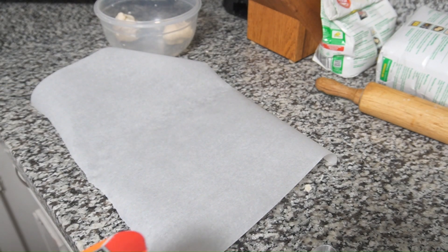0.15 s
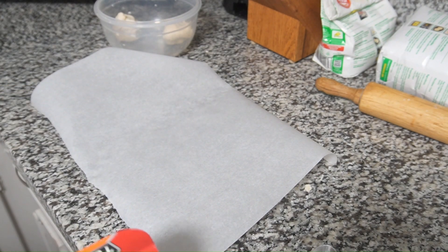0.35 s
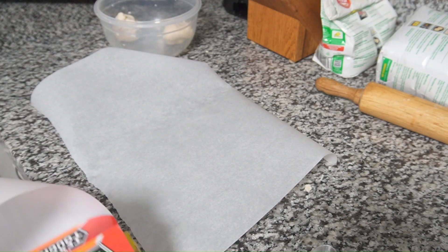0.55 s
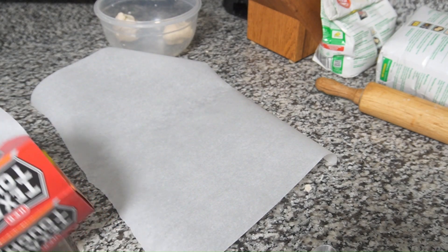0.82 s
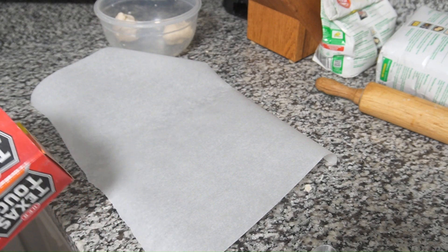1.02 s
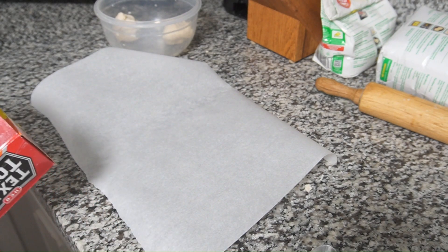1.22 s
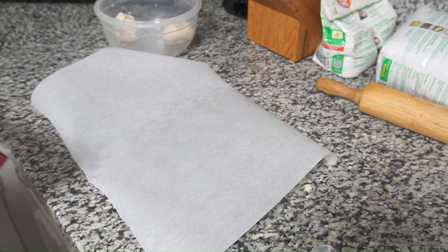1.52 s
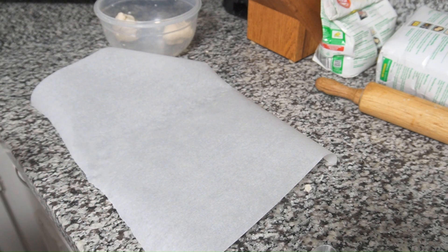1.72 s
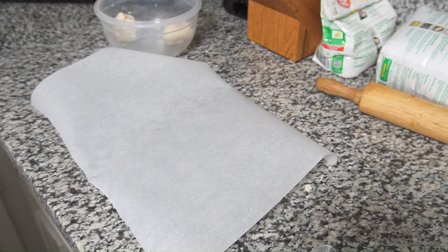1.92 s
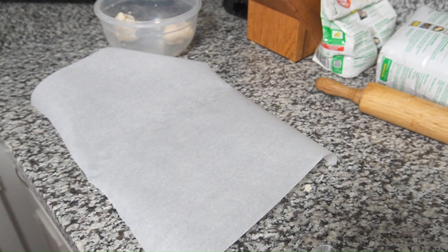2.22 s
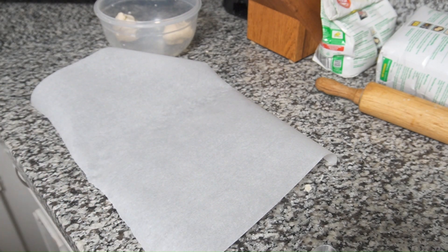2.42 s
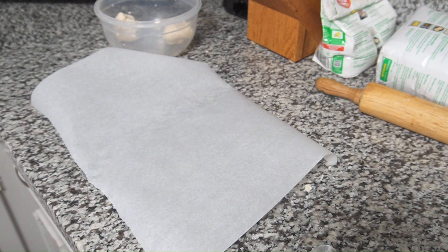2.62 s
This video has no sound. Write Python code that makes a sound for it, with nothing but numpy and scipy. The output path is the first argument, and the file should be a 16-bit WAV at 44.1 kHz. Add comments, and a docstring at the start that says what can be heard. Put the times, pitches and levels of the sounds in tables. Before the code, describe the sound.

Parchment paper rustles and slides over a stone counter in uneven strokes, with small crisp crackles.

```python
"""A sheet of parchment paper is smoothed and slid over a stone countertop in a small kitchen.
Each stroke is a stream of tiny random slips over a fine hiss, coloured by the paper and a ringing sheet.
Creases snap as short bursts of pitched noise; a soft pat near the end is a few fading sine waves.
The counter and walls scatter these sounds as decaying noise echoes. Under it all lie soft air noise
and a low appliance hum."""
import sys
import numpy as np
from scipy import signal
from scipy.fft import rfft, irfft
from scipy.io import wavfile
from scipy.ndimage import map_coordinates

SR = 44100
rng = np.random.default_rng(int(sys.argv[2]) if len(sys.argv) > 2 else 0)


def dump_mix(stems):
    """Bounce the given channels to the path in sys.argv[1] as a 16-bit WAV at rate SR."""
    frames = np.atleast_2d(stems).T  # one column per channel
    limited = np.clip(frames, -1, 1)  # hard clip at full scale
    pcm = np.round(limited * 32767).astype(np.int16)
    wavfile.write(sys.argv[1], SR, pcm)


N = 121275  # length in samples, 2.75 s


def undb(db):
    """Turn dB into a plain factor."""
    return 10 ** (np.asarray(db) / 20)


def unit(x):
    """Scale to rms 1."""
    return x / np.sqrt(np.mean(x ** 2))


def curve(points, hz):
    """Read a (Hz, dB) table on a log-frequency axis."""
    f, db = np.array(points).T
    return np.interp(np.log(hz), np.log(f), db)


def bump(hz, centre, octaves):
    """A bell of height 1 on a log-frequency axis."""
    return np.exp(-.5 * (np.log2(hz / centre) / octaves) ** 2)


def high_shelf(hz, corner_hz):
    """Rise from 0 in the lows to 1 in the highs, half way at the corner."""
    return 1 / (1 + (corner_hz / hz) ** 4)


def freqs(n):
    """Bin frequencies in Hz, kept at 1 or more so that their log exists."""
    return np.maximum(np.arange(n // 2 + 1) * SR / n, 1)


def colour(x, db):
    """Filter with the given gain per frequency bin, without sounding ahead of the input."""
    n = len(x)
    # folding the cepstrum forward in time gives the minimum-phase filter
    cepstrum = irfft(np.log(undb(db)), n)
    cepstrum[1:n // 2] *= 2
    cepstrum[n // 2 + 1:] = 0
    return irfft(rfft(x) * np.exp(rfft(cepstrum)), n)


def shape(points, hz):
    """A spectrum in dB that keeps the power of white noise."""
    db = curve(points, hz)
    return db - 10 * np.log10(np.mean(undb(db) ** 2))


def add(out, x, start):
    """Mix x into out from the start time in seconds."""
    i = max(int(start * SR), 0)
    out[i:i + len(x)] += x[:len(out) - i]


SLIPS_PER_S = 5400
SLIP_SPREAD_DB = 2.5  # how uneven the slips are in size
FINE_HISS_DB = -0.5   # hiss compared with the slips


def slips(n):
    """Paper catches on stone in tiny clicks, uneven in size and of either sign, over a fine hiss."""
    happens = rng.random(n) < SLIPS_PER_S / SR
    sign = rng.choice([-1, 1], n)
    size = undb(SLIP_SPREAD_DB * np.minimum(rng.exponential(size=n), 4))
    hiss = undb(FINE_HISS_DB) * rng.standard_normal(n)
    return unit(unit(happens * sign * size) + hiss)


# The basic colour of rubbed paper, also used by the snaps.
# Each row: frequency in Hz, relative strength in dB per Hz.
PAPER_COLOUR = [(50, -40), (150, -25.5), (230, -16.5), (310, -10), (420, -11), (600, -11), (780, -12),
                (1050, -4.5), (1500, -1), (2700, -0.5), (4800, -1.5), (6200, -4.5), (7300, -6.5),
                (10000, -10), (15500, -17)]
TREBLE_HZ, BODY_HZ = 6940, 740
MIDS_HZ, MIDS_OCTAVES, RESONANCE_OCTAVES = 1366, 0.52, 0.15
# The treble grows faster with speed, by this extra power.
BRIGHTEN, BRIGHTEN_HZ = 0.31, 6600
# The strokes of the hand.
# Each row: start in seconds, rise in seconds, hold in seconds, fall time constant in seconds,
# level in dB (before its colour and the room), treble in dB, mids in dB, body in dB,
# resonance of the sheet in Hz, height of that resonance in dB.
STROKES = [ (0.0, 0.0013, 0.0056, 0.029, -35.5, -1, 2.5, 5, 3270, 6),
           (0.061, 0.027, 0.012, 0.02, -36.5, 1, 2.5, -13, 1500, 5.5),
           (0.201, 0.0036, 0.01, 0.017, -34, -4, 6, -2, 1420, 2),
           (0.223, .003, .01, 0.011, -33.5, 5, 3.5, 4, 3600, 6),
           (0.245, 0.012, 0.046, 0.023, -33.5, -3, 4.5, 5.5, 2440, 6.5),
           (0.309, 0.018, 0.1, 0.066, -27, 6.5, 4.5, 9.5, 1570, -3),
           (0.377, 0.033, .008, 0.01, -30, 9, 6.5, 14, 975, 15.5),
           (0.403, 0.065, 0.18, 0.032, -24, 4.5, 0, 3.5, 5200, 1),
           (0.677, 0.028, 0.044, .02, -32, -4, 4, -1, 1890, 3.5),
           (0.721, 0.029, 0.024, 0.04, -24.5, 4, -4, 1, 4800, 3),
           (0.827, 0.028, 0.073, .02, -23.5, -8.5, -1, -1, 5170, 2.5),
           (0.899, 0.0023, 0.0054, .01, -22, -0.5, -20, -2, 4260, 5),
           (0.935, 0.034, 0.072, 0.024, -23.5, -8.5, 1, -3.5, 5500, 2.5),
           (0.991, 0.022, 0.022, .015, -33, 9, -2, 0, 2450, -10),
           (1.119, 0.043, 0.028, 0.03, -25, -4.5, 4.5, -2, 1660, -0.5),
           (1.273, .04, .02, .02, -35.5, -3.5, 6.5, 1, 1200, 6),
           (1.317, 0.038, 0.019, 0.03, -24.5, -0.5, -1, -3, 1306, 9.5),
           (1.391, 0.038, 0.022, 0.035, -29, -5.5, 7, 0.5, 535, 8.5),
           (1.475, 0.0012, 0.0054, 0.019, -32.5, 13.5, -6, -6, 3740, 6),
           (1.563, 0.0048, 0.063, 0.066, -35, -4.5, 2.5, 6.5, 1940, 1),
           (1.636, 0.075, .03, 0.025, -21.5, -2, 1, 2, 368, 4.5),
           (1.733, 0.028, 0.056, 0.025, -24, 6, 1, 1, 2960, 6),
           (1.802, 0.047, 0.17, 0.041, -23.5, 5, 0, 2, 500, 0),
           (2.016, 0.046, 0.037, 0.035, -21.5, -1, -3, 2.5, 312, 6),
           (2.108, 0.018, 0.036, 0.05, -27, -5.5, 0, -7, 2300, 1),
           (2.238, 0.0028, 0.02, 0.052, -29.5, -3, -5.5, 6.5, 500, 3),
           (2.28, 0.0054, 0.021, 0.059, -23, 1.5, -2.5, 0.5, 4430, 1),
           (2.379, 0.025, 0.01, 0.056, -27, -1.5, -6, 1.5, 2800, 2),
           (2.478, 0.013, 0.081, 0.021, -44.5, 2.5, 3, 4, 3520, 0),
           (2.579, 0.0054, 0.021, 0.014, -47.5, -9, 0.5, 21, 2350, 7),
           (2.695, 0.029, 0.022, .02, -49, 0, 3, -5.5, 4000, -1), ]


def strokes(size=32768):
    """Each stroke swells, holds and dies away, brighter when fast; the free sheet sets its colour."""
    out, t, hz = np.zeros(N), np.arange(size) / SR, freqs(size)
    for start, rise, hold, fall, db, treble, mids, body, ring_hz, ring_db in STROKES:
        swell = np.minimum(t / rise, 1)
        speed = swell * np.exp(-np.maximum(t - rise - hold, 0) / fall)
        rub = slips(size) * speed
        high = irfft(rfft(rub) * high_shelf(hz, BRIGHTEN_HZ))
        brightened = rub + high * (speed ** BRIGHTEN - 1)
        tone = shape(PAPER_COLOUR, hz)
        tone += treble * high_shelf(hz, TREBLE_HZ)
        tone += mids * bump(hz, MIDS_HZ, MIDS_OCTAVES)
        tone += body / (1 + (hz / BODY_HZ) ** 4)  # a shelf for the lows
        tone += ring_db * bump(hz, ring_hz, RESONANCE_OCTAVES)
        add(out, undb(db) * colour(brightened, tone), start)
    return out


FLEX_DB = 0.57  # strength of the random gain changes
FLEX_PER_S, FLEX_PER_OCTAVE = 34, 6  # random points per second and, in the treble, per octave


def flex(x):
    """Narrow resonances of the sheet come and go as it bends under the hand."""
    hz, t, z = signal.stft(x, SR, nperseg=512)
    row = np.log2(1 + hz / 100) * FLEX_PER_OCTAVE
    place = np.meshgrid(row, t * FLEX_PER_S, indexing="ij")
    # a smooth random landscape over pitch and time
    wander = map_coordinates(rng.standard_normal(size=(128, 256)), place, order=3, mode="mirror")
    return signal.istft(z * undb(FLEX_DB * wander), SR)[1][:N]


# Counter echo: time constant in seconds, level in dB against the direct sound, before colouring.
SCATTER_S, SCATTER_DB = 0.0028, -7.5
# Room tail: time to fall by 60 dB in seconds, level in dB as above.
ROOM_T60_S, ROOM_DB = 0.54, -7
PATH_CHANGE_S = .04  # a new random echo pattern fades in this often
# Colour of the scattered sound. Each row: frequency in Hz, gain in dB.
SCATTER_COLOUR = [(150, -11.5), (500, -7.5), (1200, 1), (4000, 0), (14000, 3)]
# The walls swallow the treble. Each row: frequency in Hz, gain in dB.
ROOM_COLOUR = [(300, 3), (3000, 1.5), (7000, -0.5), (14000, -5)]
# Left-right difference of the scattered sound. Each row: frequency in Hz, gain in dB.
WIDTH = [(100, -20), (300, -17), (550, -10.5), (1100, -9.5), (2000, -4.5), (4000, -1.5), (8000, 1),
         (14000, 4)]
# The sheet lies a little to the left. Each row: frequency in Hz, left minus right in dB.
PAN = [(200, .3), (600, 1.3), (4000, 1.1), (8000, .1)]


def echoes(x, decay):
    """Many random reflections under a fading outline; the paths change as the hand moves."""
    out, hop = np.zeros(N + 16384), int(PATH_CHANGE_S * SR)
    for centre in range(0, N + hop, hop):
        i = np.arange(max(centre - hop, 0), min(centre + hop, N))
        piece = x[i] * np.cos(np.pi / 2 * (i - centre) / hop)  # crossfade between patterns
        pattern = decay * rng.standard_normal(len(decay))
        add(out, signal.fftconvolve(piece, pattern), i[0] / SR)
    return out


def kitchen(x, size=16384):
    """Direct sound, quick scatter from the counter and a short, duller room tail, in stereo."""
    t, hz = np.arange(size) / SR, freqs(N + size)
    near = unit(np.exp(-t / SCATTER_S) * (1 - np.exp(-t / SCATTER_S)))
    near *= undb(SCATTER_DB) / np.sqrt(size)
    far = unit(np.exp(-np.log(1000) * t / ROOM_T60_S) * np.minimum(t / 0.012, 1))
    far *= undb(ROOM_DB) / np.sqrt(size)

    def scattered():
        tail = colour(echoes(x, far), curve(ROOM_COLOUR, hz))
        return echoes(x, near[:size // 8]) + tail

    mid = x + colour(scattered(), curve(SCATTER_COLOUR, hz))[:N]
    side = colour(scattered(), curve(SCATTER_COLOUR, hz) + curve(WIDTH, hz))[:N]
    pan = curve(PAN, freqs(N)) / 2
    ears = np.array([colour(mid + s * side, s * pan) for s in (1, -1)])  # left, right
    return ears / np.sqrt(1 + np.sum(near ** 2 + far ** 2))


AIR_DB = -49  # air noise that both sides share
AIR_SIDE_DB = -19.5  # left-right difference, compared with the shared part
# Colour of the air noise. Each row: frequency in Hz, relative strength in dB per Hz.
AIR_COLOUR = [(25, -24.5), (60, -7), (130, -2.5), (300, -0.5), (700, -6.5), (1300, -5.5), (3000, -5.5),
              (6000, -12), (15000, -29)]
# Appliance hum. Each row: frequency in Hz, level in dB, phase lead of the left side in cycles.
HUM = [(59.7, -63, .02), (120, -68, 0.076)]


def room_tone():
    """Steady air noise and the hum of an appliance, which reaches the two sides out of step."""
    t, ears = np.arange(N) / SR, np.array([[1], [-1]])
    mid, side = (colour(rng.standard_normal(N), shape(AIR_COLOUR, freqs(N))) for _ in range(2))
    air = undb(AIR_DB) * (mid + undb(AIR_SIDE_DB) * side * ears)
    hum = 0
    for hz, db, lead in HUM:
        cycles = hz * t + rng.random() + ears * lead / 2
        hum = hum + np.sqrt(2) * undb(db) * np.sin(2 * np.pi * cycles)
    return hum + air


SNAP_DECAY_S = 0.0023  # time constant
SNAP_OCTAVES, SNAP_FOCUS_DB = 0.58, 16  # width and height of the pitched peak
SNAP_DB = 0.5  # added to every snap
# Creases that snap.
# Each row: time in seconds, peak level in dB (before the shared boost and the room), pitch in Hz.
SNAPS = [(0.006, -25, 3350), (0.073, -28, 3200), (0.185, -26.5, 2670), (0.2227, -16.5, 3100),
         (0.23, -25, 3970), (0.233, -38, 5050), (0.317, -16, 2940), (0.326, -18, 6300),
         (0.419, -10.5, 1480), (0.422, -12, 1200), (0.448, -12.5, 4500), (0.765, -13, 7000),
         (0.785, -14.5, 9070), (0.9, -14, 4400), (1.108, -22, 9000), (1.479, -23, 7000), (2.553, -31, 5000)]


def snaps(size=2048):
    """A crease flips over with a short, pitched crack: a fading burst of filtered noise."""
    out, t, hz = np.zeros(N), np.arange(size) / SR, freqs(size)
    for start, db, pitch_hz in SNAPS:
        burst = rng.standard_normal(size) * np.exp(-t / SNAP_DECAY_S)
        tone = curve(PAPER_COLOUR, hz) + SNAP_FOCUS_DB * bump(hz, pitch_hz, SNAP_OCTAVES)
        crack = colour(burst, tone)
        add(out, undb(db + SNAP_DB) * crack / np.abs(crack).max(), start)
    return out


# Start in seconds, level in dB before the room, time constant of the soft onset in seconds.
PAT_S, PAT_DB, PAT_PUSH_S = 2.287, -20, 0.0093
# The tones that the pat rings.
# Each row: frequency in Hz, relative level in dB, time to fall by 60 dB in seconds.
PAT_MODES = [(323, -8, .07), (503, 3, 0.087), (820, -6.5, 0.092), (1260, -23, .08), (1950, -8, .06)]


def pat():
    """A soft, hollow knock as the paper is pressed down: fading sine waves with a gentle onset."""
    out, t = np.zeros(N), np.arange(SR // 2) / SR
    ring = np.zeros(len(t))
    for hz, db, t60 in PAT_MODES:
        ring += undb(db) * np.sin(2 * np.pi * hz * t) * np.exp(-np.log(1000) * t / t60)
    push = 1 - np.exp(-t / PAT_PUSH_S)
    add(out, undb(PAT_DB) * ring * push, PAT_S)
    return out


def scene():
    """The paper sounds in the kitchen, over the room tone."""
    paper = flex(strokes()) + snaps() + pat()
    return kitchen(paper) + room_tone()


TOP_HZ = 15850


def record(dry):
    """A steep low-pass filter cuts the highest treble."""
    low_pass = signal.ellip(12, .1, 80, TOP_HZ, fs=SR, output="sos")
    return signal.sosfilt(low_pass, dry)


dry = scene()
out = record(dry)
dump_mix(out)
```